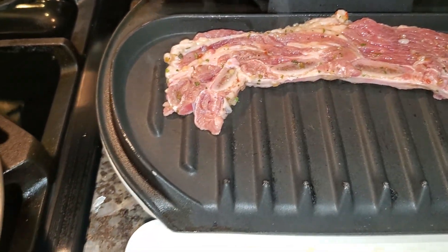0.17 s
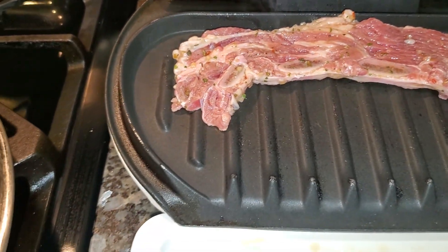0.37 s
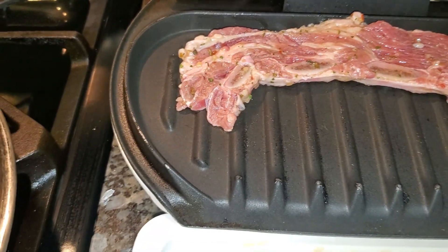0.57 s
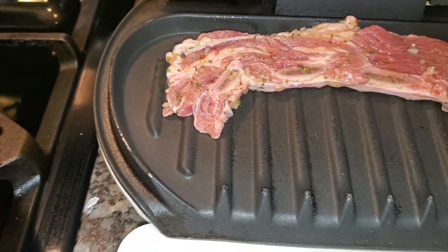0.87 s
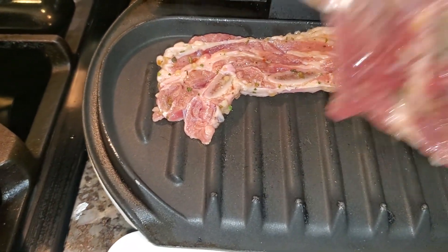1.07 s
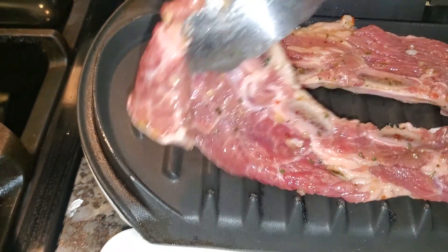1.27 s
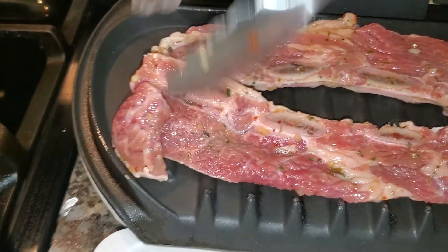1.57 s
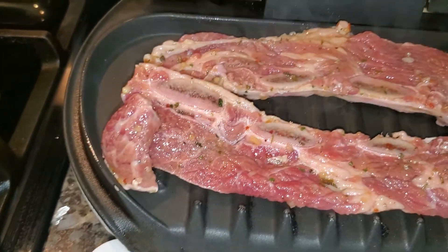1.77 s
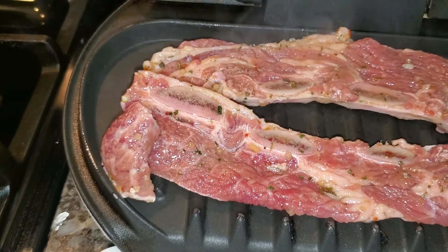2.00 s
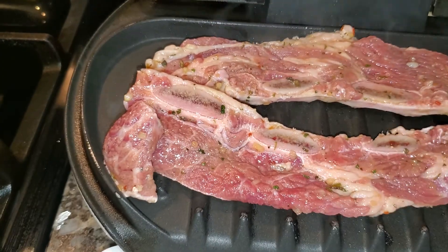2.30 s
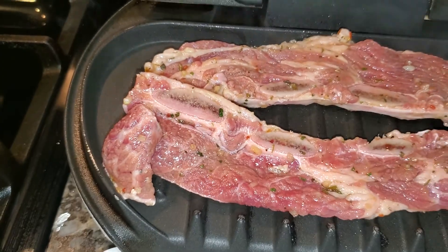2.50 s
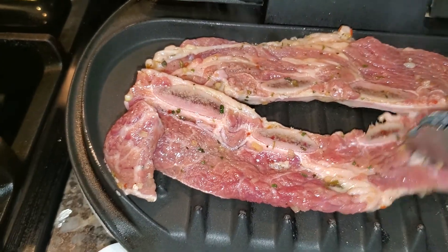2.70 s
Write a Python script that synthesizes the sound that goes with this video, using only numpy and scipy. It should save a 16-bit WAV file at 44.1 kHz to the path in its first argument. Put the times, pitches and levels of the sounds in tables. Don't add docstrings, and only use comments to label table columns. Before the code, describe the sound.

Dense steady sizzle of meat strips on an electric grill, with sharp fat pops and a faint tong knock

```python
import sys
import numpy as np
from scipy import signal
from scipy.fft import rfft, irfft
from scipy.io import wavfile
from scipy.ndimage import uniform_filter1d

SR = 44100
rng = np.random.default_rng(int(sys.argv[2]) if len(sys.argv) > 2 else 0)


def master_out(mix):
    frames = np.transpose(np.atleast_2d(mix))
    ceiling = np.clip(frames, -1, 1)
    pcm = np.round(ceiling * 32767).astype(np.int16)
    wavfile.write(sys.argv[1], SR, pcm)


def volts_from_db(level):
    exponent = np.asarray(level, float) / 20
    return 10 ** exponent


N = 125685
T = np.arange(N) / SR
HZ = np.maximum(np.arange(N // 2 + 1) * SR / N, 1)

# time_s [s], level_db [dB], treble_lift_db [dB]
BOIL = [(0, -24, 1.3), (.3, -23.7, 0.1), (.55, -24, 1.2), (.85, -23.5, 3.2), (1.1, -24.6, -1.3),
        (1.2, -24, 1.1), (1.27, -23, 2.5), (1.5, -22.5, 2.5), (1.75, -22, 0), (1.95, -22.5, 0),
        (2.2, -23, -1.8), (2.4, -23.5, -1.8), (2.6, -23, 0.5), (2.85, -24, -2)]
# frequency_hz [Hz], density_db [dB per Hz]
BUBBLE_SPECTRUM = [(300, -24), (1100, -16.5), (1600, -11), (2200, -6.5), (2600, -2), (5500, -0.5),
                   (9000, -2.5), (15700, -2.5)]
# pitch_hz [Hz], width_hz [Hz], left_boost_db [dB], right_boost_db [dB]
GROOVES_ONE_STRIP = [(794, 170, 10, 9), (1880, 230, 3.5, 5), (2423, 89, 6, 5.5), (3100, 240, 6, 1),
                     (4250, 420, 2, 5), (5720, 400, 3, 3), (11500, 700, 3.5, -1)]
# pitch_hz [Hz], width_hz [Hz], left_boost_db [dB], right_boost_db [dB]
GROOVES_TWO_STRIPS = [(740, 300, 5.6, 6.4), (1900, 250, 2.4, 2.9), (2620, 160, 5.3, 1.7),
                      (3370, 290, 4.1, 1.6), (4500, 660, 0.5, 1.8), (5200, 150, 1.2, 1.7),
                      (8600, 350, 0.2, 1.8), (12200, 900, 1.1, 1)]
# start_s [s], level_over_fizz_db [dB], left_minus_right_db [dB]
SPITS = [(.301, 18, 3), (.437, 16.5, 6), (.451, 17, -8), (0.533, 17, 0.5), (.742, 6, 3), (.818, 19.5, .5),
         (.826, 11, 0), (1.083, 17, 0.5), (1.229, 15, -8), (1.381, 9, 0.5), (1.448, 9, -12),
         (1.507, 17, -7), (1.586, 16, 6), (1.780, 19, -5), (2.070, 15, 3), (2.092, 9, 2), (2.333, 13, .5),
         (2.560, 17, .5)]
# start_s [s], length_s [s], pitch_hz [Hz], width_hz [Hz], level_db [dB]
WHISTLES = [(1.166, 0.1, 2550, 300, -33), (1.167, 0.21, 1900, 300, -37.5), (1.45, 0.43, 8900, 900, -36),
            (2.123, 0.61, 2620, 180, -33), (2.74, .11, 2060, 300, -35), (2.77, .12, 606, 150, -51),
            (1.116, .05, 760, 150, -48), (2.046, 0.12, 4400, 500, -34), (2.25, .12, 4600, 500, -32),
            (0, 1, 4250, 250, -41), (0, 0.83, 2450, 200, -43)]
# pitch_hz [Hz], level_db [dB], t60_s [s]
KNOCK_MODES = [(180, -3, 0.045), (340, -7, .03), (500, -1, 0.039), (636, 6.5, 0.043), (830, 3, 0.049),
               (1056, 7.5, 0.032), (1330, 3, .035), (1570, 6.5, 0.038), (1850, -5, 0.027)]
# time_s [s], pitch_hz [Hz], level_db [dB]
SLIDE = [
    (2.162, 680, -58),
    (2.171, 670, -43),
    (2.180, 680, -54),
    (2.190, 700, -42.5),
    (2.205, 720, -42),
    (2.221, 770, -39.5),
    (2.230, 740, -47),
    (2.245, 620, -56),
]
# pitch_hz [Hz], level_db [dB]
HUM = [(60, -63), (120, -58), (193, -73), (240, -63.5), (258.4, -66.5)]
# frequency_hz [Hz], density_db [dB per Hz]
FAN_SPECTRUM = [(20, -19), (45, -10), (80, -10), (110, -0.5), (160, -6.5), (280, -6.5), (450, 2), (900, -1)]
# frequency_hz [Hz], gain_db [dB]
LEFT_PORT = [(1000, 0.7), (5900, -0.5), (6500, -2), (7600, -2.5), (10500, -2.5), (12500, -0.3),
             (14500, -0.8), (15600, -1.5)]
# frequency_hz [Hz], gain_db [dB]
RIGHT_PORT = [(5600, 1.26), (6400, -7), (7900, -8), (8600, 4), (10100, 3), (11000, -3.5), (12200, 0.6),
              (15600, -1.2)]
# frequency_hz [Hz], likeness [0-1]
PORT_LIKENESS = [(40, 0.6), (700, 0.95), (1100, 0.45), (1500, .5), (2300, 0.4), (2900, 0.11), (6000, 0.01),
                 (15000, 0)]

LANDS_S, SETTLE_S = 1.11, 0.23


def sizzle():
    noise = pair()
    contact = ticks() * 0.63 + spits()
    clicks = signal.lfilter([1, -0.6], [1], contact)
    time_s, boil_db, treble_db = np.array(BOIL).T
    covered = strip_down()
    shade_start_s, shade_length_s, shade_hz, shade_db = 1.1, 0.28, 4600, -4.5
    shade = np.sin(np.pi * np.clip((T - shade_start_s) / shade_length_s, 0, 1))
    base = volts_from_db(along(BUBBLE_SPECTRUM))
    one_strip = base * grooves(GROOVES_ONE_STRIP)
    two_strips = base * grooves(GROOVES_TWO_STRIPS)
    out = 0
    for octave in range(8, 15):
        centre_hz = 2.0 ** octave
        band = np.clip(1 - abs(np.log2(HZ) - octave), 0, 1)
        raw = rfft(bursts() * noise + clicks) * band
        shaded_db = shade_db * shade * np.exp(-np.log2(centre_hz / shade_hz) ** 2)
        lift_db = np.interp(T, time_s, treble_db) / (1 + (8000 / centre_hz) ** 2)
        wobble = volts_from_db(0.098 * walk(7) + 0.34 * walk(14) + shaded_db + lift_db)
        before = (1 - covered) * irfft(raw * one_strip, N)
        after = covered * irfft(raw * two_strips, N)
        out = out + wobble * (before + after)
    out = shaped(out, volts_from_db([along(LEFT_PORT), along(RIGHT_PORT)]))
    power = uniform_filter1d(np.mean(out ** 2, axis=0), size=SR // 4)
    return out / np.sqrt(power) * volts_from_db(np.interp(T, time_s, boil_db) + 3.5)


def grooves(table):
    left_db = sum(left * bell(hz, width) for hz, width, left, _ in table)
    right_db = sum(right * bell(hz, width) for hz, width, _, right in table)
    return volts_from_db([left_db, right_db])


def bursts():
    bubbles_per_s, scatter_db, burst_s = 9000, 2, 0.00033
    spit_s, spit_tail_db = 0.0008, -16
    starts = rng.random(N) < bubbles_per_s / SR
    size = np.minimum(rng.exponential(size=N), 3.9)
    small = fade(starts * volts_from_db(2 * scatter_db * size), burst_s)
    hiss = fade(spits() ** 2, spit_s) * volts_from_db(2 * spit_tail_db)
    return np.sqrt(small / small.mean() + hiss)


def spits():
    out = np.zeros((2, N))
    for start_s, db, pan_db in SPITS:
        out[:, int(start_s * SR)] = volts_from_db(db + np.array([pan_db, -pan_db]) / 2)
    return out


def ticks():
    ticks_per_s, tick_db, scatter_db, right_pan_db = 220, 6.5, 2.6, 1
    when, size, pan, lag = rng.random((2000, 4))[:int(ticks_per_s * N / SR)].T
    db = tick_db - scatter_db * np.log(0.03 + size)
    sign = np.sign(lag - 0.3)
    start = when * (N - 40)
    out = np.zeros((2, N))
    np.add.at(out[0], (start + 12).astype(int), sign * volts_from_db(db))
    np.add.at(out[1], (start + lag * 24).astype(int), sign * volts_from_db(db + right_pan_db * (2 * pan - 1)))
    return out


def seethe():
    out = 0
    for start_s, length_s, hz, width_hz, db in WHISTLES:
        swell = np.sin(np.pi * np.clip((T - start_s) / length_s, 0, 1))
        puff = unit(shaped(pair(), bell(hz, width_hz)))
        out = out + volts_from_db(db + 1.4 * walk(30.2)) * swell * puff
    return out


def tongs():
    knock_s, knock_db, push_s, pan_db = 2.045, -37.5, 0.0065, -5.5
    t = np.maximum(T - knock_s, 0)
    ring = sum(volts_from_db(db) * np.sin(2 * np.pi * hz * t) * 1000.0 ** (-t / t60) for hz, db, t60 in KNOCK_MODES)
    push = np.minimum(t / push_s, 1) * volts_from_db(60 * push_s / 0.041)
    knock = volts_from_db(knock_db) * ring * push
    time_s, hz, db = np.array(SLIDE).T
    phase = 2 * np.pi * np.cumsum(np.interp(T, time_s, hz)) / SR
    tone = np.sin(phase) * (1 + 0.15 * walk(300))
    squeak = tone * volts_from_db(np.interp(T, time_s, db, left=-120, right=-120)) * np.sqrt(2)
    return (knock + squeak) * volts_from_db(np.array([[pan_db], [-pan_db]]) / 2)


def kitchen():
    hum = 0
    for hz, db in HUM:
        level = volts_from_db(db + 0.94 * walk(8.6)) * np.sqrt(2)
        hum = hum + level * np.sin(2 * np.pi * hz * T + 0.16 * walk(5.9))
    hum = hum * volts_from_db(-3 * strip_down())
    fan_colour = volts_from_db(along(FAN_SPECTRUM)) / (1 + (HZ / 800) ** 4)
    fan = unit(shaped(pair(), fan_colour)) * volts_from_db(-51.5 + 1.1 * walk(12))
    return (hum + fan) * volts_from_db([[-0.7], [0.7]])


def strip_down():
    return np.clip((T - LANDS_S) / SETTLE_S, 0, 1)


def pair():
    mid, side = rng.standard_normal((2, N))
    likeness = np.clip(along(PORT_LIKENESS), 0, 1)
    shared = shaped(mid, np.sqrt((1 + likeness) / 2))
    opposed = shaped(side, np.sqrt((1 - likeness) / 2))
    both = shared + opposed * np.array([[1], [-1]])
    lead_s = 0.00003 * np.array([[0], [1]])
    return shaped(both, np.exp(2j * np.pi * HZ * lead_s))


def walk(rate):
    k = int(SR / rate)
    held = np.repeat(rng.standard_normal(N // k + 1), k)
    return 1.86 * uniform_filter1d(uniform_filter1d(held, k), k)[:N]


def fade(x, tau_s):
    return signal.lfilter([1], [1, -np.exp(-1 / (tau_s * SR))], x)


def bell(hz, width_hz):
    return 1 / (1 + (2 * (HZ - hz) / width_hz) ** 2)


def along(table):
    hz, value = np.array(table, float).T
    return np.interp(np.log(HZ), np.log(hz), value)


def shaped(x, gain):
    return irfft(rfft(x) * gain, N)


def unit(x):
    return x / np.sqrt(np.mean(x ** 2))


def scene():
    return sizzle() + seethe() + tongs() + kitchen()


def band_limit(x):
    return signal.sosfilt(signal.butter(12, 17080, fs=SR, output="sos"), x)


def record(dry):
    mix = shaped(dry, HZ < 15760)
    return band_limit(mix)


dry = scene()
out = record(dry)
master_out(out)
```